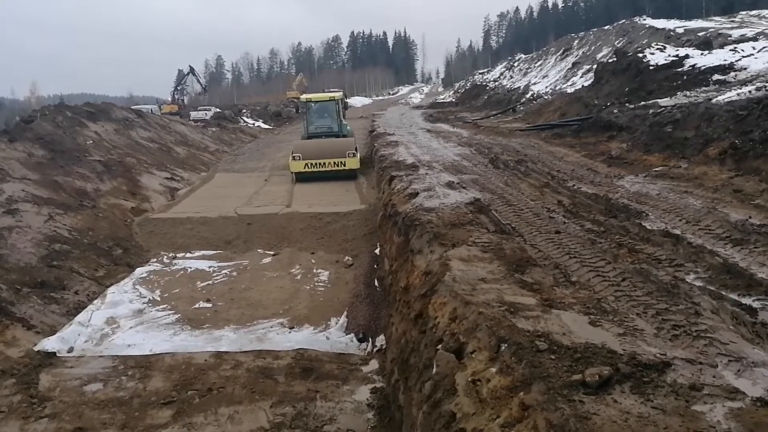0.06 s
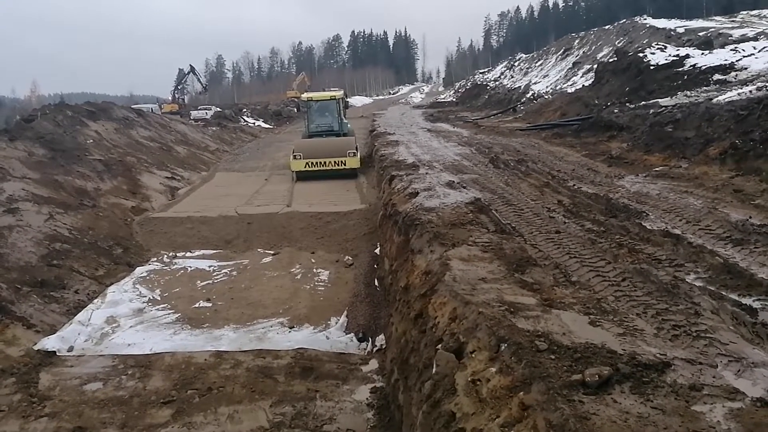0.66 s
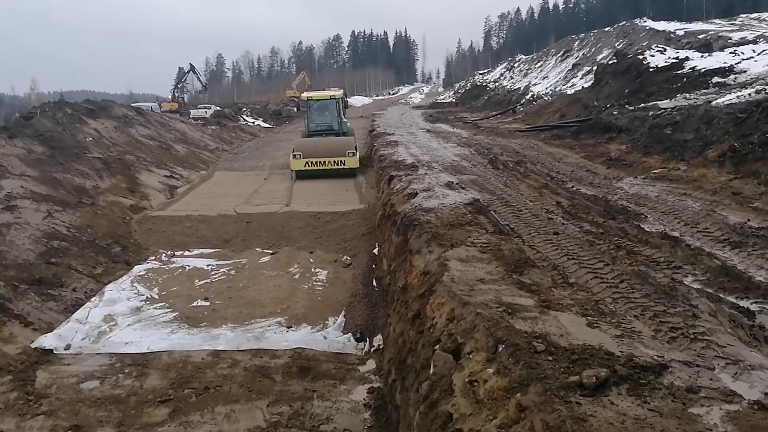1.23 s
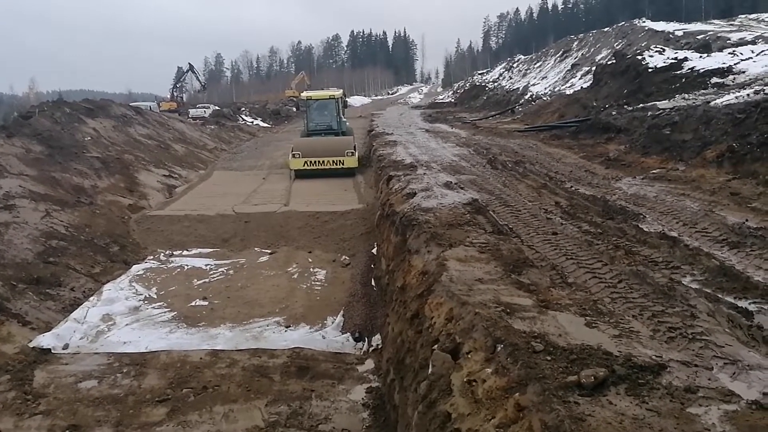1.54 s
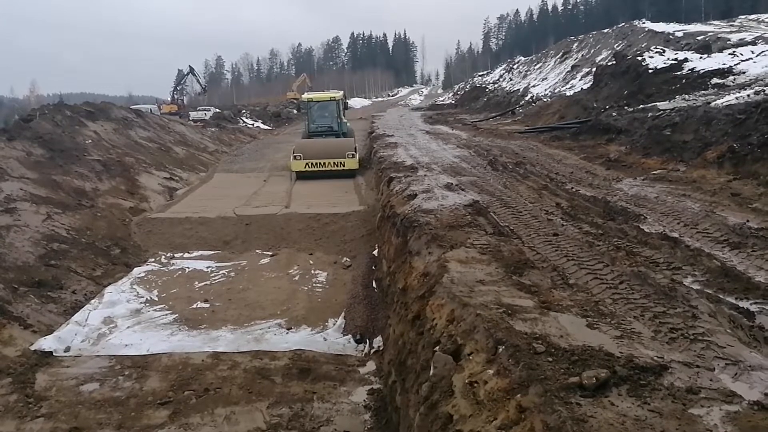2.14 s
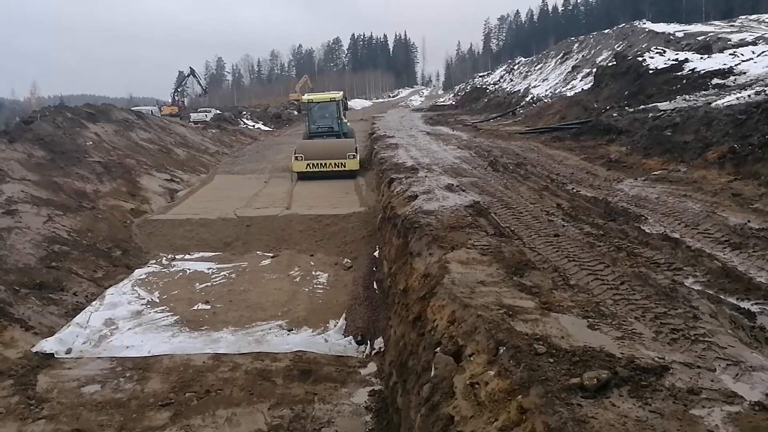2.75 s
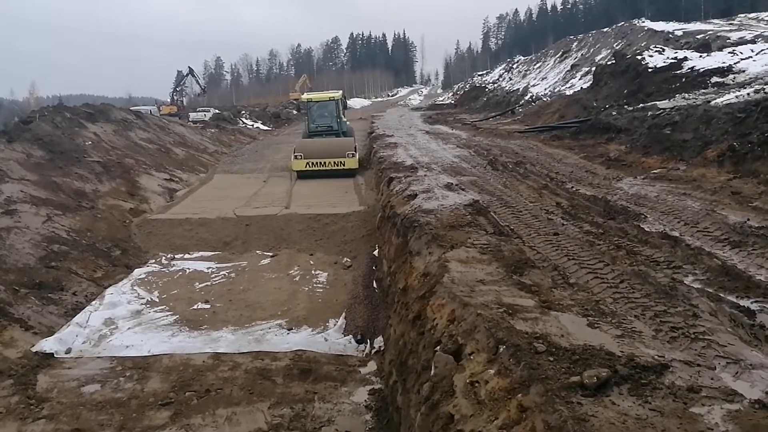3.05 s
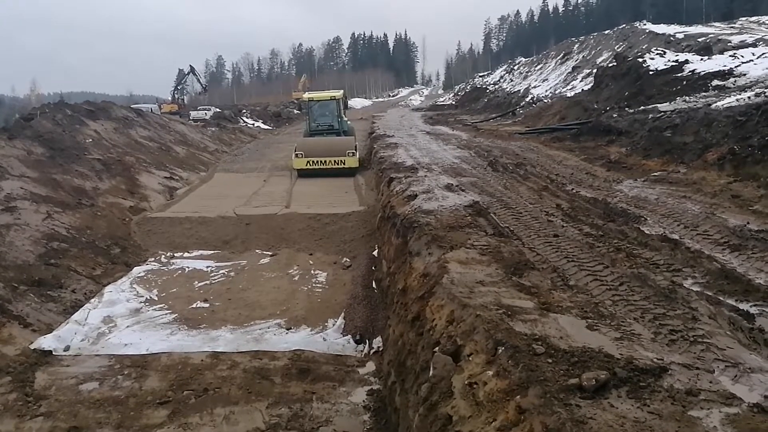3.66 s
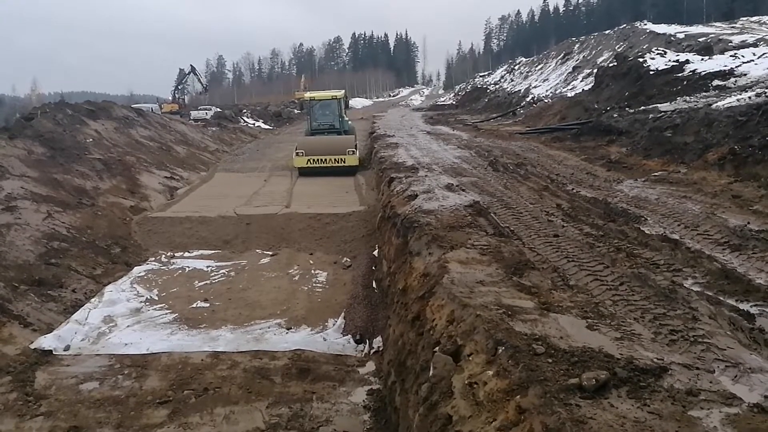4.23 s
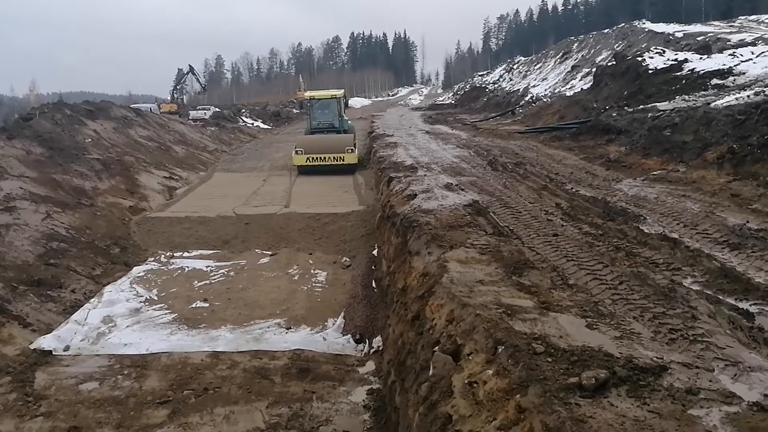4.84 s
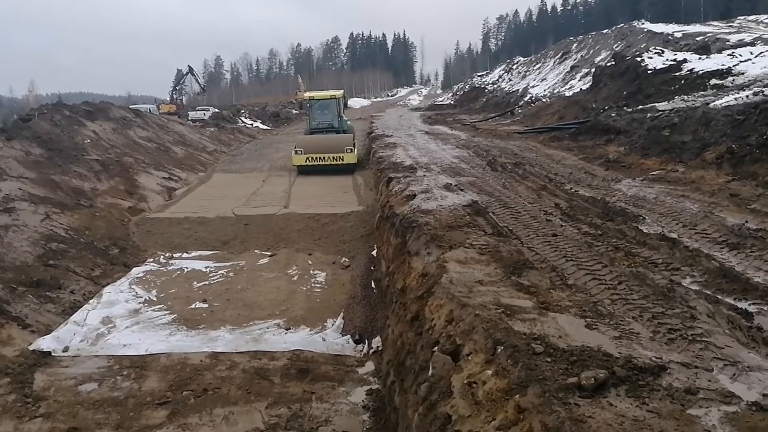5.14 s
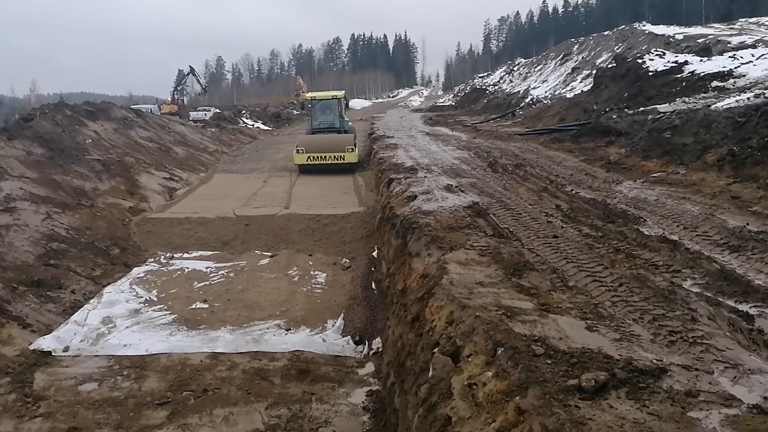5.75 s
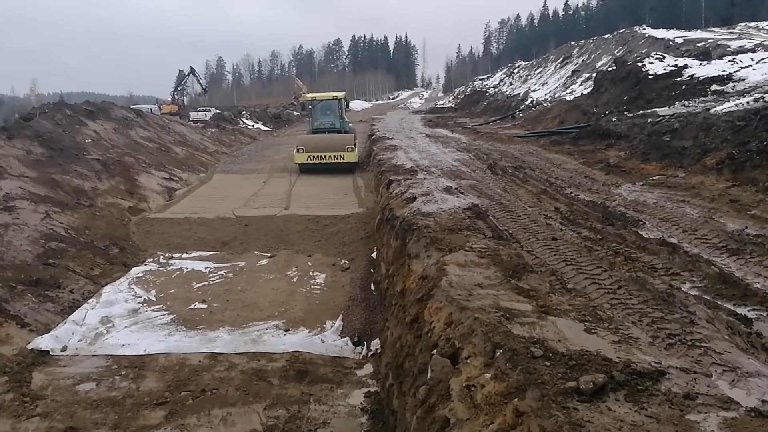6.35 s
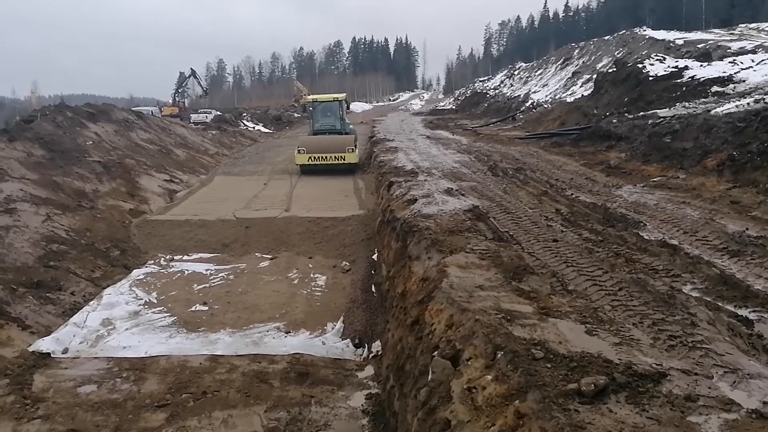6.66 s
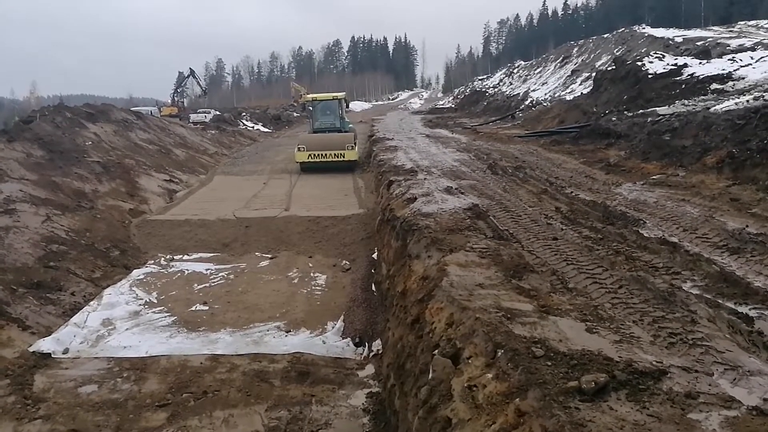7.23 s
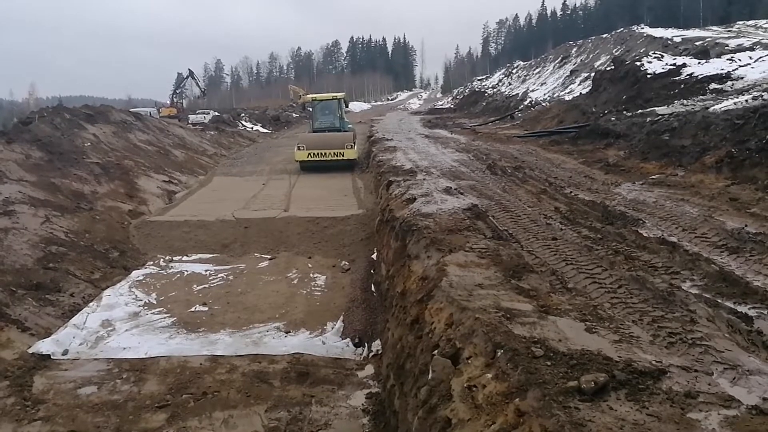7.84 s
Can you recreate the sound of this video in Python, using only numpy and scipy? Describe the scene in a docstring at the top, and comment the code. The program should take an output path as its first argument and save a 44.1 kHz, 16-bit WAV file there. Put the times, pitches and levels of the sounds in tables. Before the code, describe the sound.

A vibrating road roller hums deeply over diesel engine drone, its loose metal rattling ever louder with short steel squeals.

```python
"""A vibratory road roller compacting sand, some way off across an open building site, in stereo.
The eccentric weight in its drum shakes the ground with a deep hum and sets its hollow body booming.
Loose metal rattles ever louder in time with the drum, among squeals of rubbed steel and clinks of grit.
Its diesel, an excavator and a far exhaust drone over the site's low rumble, and the breeze
carries swells of engine roar over to a microphone that is dull in the top treble."""
import sys
import numpy as np
from scipy import signal
from scipy.fft import rfft, irfft
from scipy.io import wavfile

SR = 44100
rng = np.random.default_rng(int(sys.argv[2]) if len(sys.argv) > 2 else 0)


def output_pcm(signal):
    """Save a mono or channel-first signal as 16-bit PCM at the path in sys.argv[1].

    Samples are clipped to [-1, 1] before scaling.
    """
    pcm = np.clip(np.atleast_2d(signal).T, -1, 1) * 32767
    wavfile.write(sys.argv[1], SR, np.round(pcm).astype(np.int16))


N = 352359
TIME = np.arange(N) / SR
BINS = np.fft.rfftfreq(N, 1 / SR)
DIESEL_HZ, DIGGER_HZ, EXHAUST_HZ = 17.497, 14.32, 84.25  # engine cycles a second


def drum(turns):
    """The eccentric weight gives a near sine; blows on the sand add weak overtones."""
    # The hum eases once, midway. Each row: time in seconds, level in dB.
    hum_level = [(2.9, -18), (4.3, -19.5)]
    # Each row: multiple of the shaking rate, level in dB.
    overtones = [(2, -51.5), (3, -46.5), (4, -59.5), (5, -52.5)]
    hum = np.sqrt(2) * amp(curve(hum_level)) * np.cos(2 * np.pi * turns)
    return panned(hum, 3.15) + tones(turns, overtones, flutter=0.25, flutter_hz=1.1)


def pounding(turns, depth=0.2, uneven_db=1.5):
    """Throbbing gain: ground and body shake hardest at both ends of each stroke, no two blows alike."""
    return evened((1 + depth * np.cos(4 * np.pi * turns)) * amp(uneven_db * drift(17)))


def boom(drone_db=-5.5, waver_db=3.5):
    """Uneven blows of the ground make the roller's body drone, with louder spells."""
    # Hollow resonances. Each row: pitch and width in Hz, left and right level in dB.
    body_modes = [(174.8, 25, -40, -44), (239.2, 7.8, -44, -48)]
    # Each row: middle and length in seconds, gain in dB.
    spells = [(1.014, 0.29, -1), (2.003, 0.45, -0.5), (3.4, 0.24, -9), (4.5, 1, 1.5), (5.003, 0.46, 5),
              (5.731, 0.12, 6), (6.505, 0.23, 7.5), (7.605, 0.19, 6.5)]
    drone = amp(drone_db + waver_db * drift(5.5))
    spell_power = sum((amp(db) * swell(s, length)) ** 2 for s, length, db in spells)
    return modes(rng.standard_normal(N), body_modes) * np.sqrt(drone ** 2 + spell_power)


def rattle(turns, start_db=-18.5, growth_db_per_s=2, lead_turns=0.18, jolt_decay_s=0.12):
    """Each shake throws loosening metal into a chatter that sets it ringing; grit ticks on the steel."""
    # Each row: frequency in Hz, left and right level in dB.
    chatter_spectrum = [(200, -89, -85.5), (292, -70, -71), (430, -68, -67.5), (746, -74.5, -79),
                        (1050, -77.5, -76.5), (1500, -79, -70), (2200, -72.5, -78), (2720, -94.5, -96),
                        (3200, -82, -95.5), (3800, -88.5, -88), (5000, -92.5, -101), (7000, -95.5, -101),
                        (10100, -109, -107)]
    # Resonances struck by metal and by grit. Each row: pitch and width in Hz, left and right level in dB.
    metal_modes = [(1033, 12, -60, -53), (1096, 18, -57.5, -53.5), (1900, 41, -62, -56),
                   (2034, 110, -58, -62.5), (2700, 24, -66.5, -69.5), (2860, 18, -59, -64.5),
                   (3027, 40, -55, -62), (3098, 34, -56.5, -65), (3295, 32, -59, -74),
                   (3367, 34, -59.5, -72), (3860, 120, -72, -64), (4220, 60, -72.5, -72)]
    grit_modes = [(4900, 49, -61.5, -75), (5350, 59, -65, -70), (5990, 220, -64, -67.5),
                  (8300, 1000, -71.5, -73.5)]
    # How strongly the metal rings. Each row: time in seconds, gain in dB.
    ring_gain = [(2.7, 2), (6.3, -1.5), (6.68, 3.5), (7.5, 4.5)]
    # Moments of harder shaking. Each row: start in seconds, extra level in dB.
    jolts = [(5.405, 3.5), (6.44, 3), (6.66, 0.5), (6.78, -0.5), (7.2, 3)]
    throw = np.exp(0.25 * np.cos(2 * np.pi * (turns + lead_turns)))  # peaks ahead of the hum's crest
    blows = evened(throw * amp(1.7 * drift(22) + 2.5 * drift(500)))
    jolts_db = sum(db * (TIME > s) * np.exp(-abs(TIME - s) / jolt_decay_s) for s, db in jolts)
    ringing = modes(impacts(blows, per_s=900, spread_db=2), metal_modes) * amp(curve(ring_gain))
    grit = modes(impacts(blows, per_s=280, spread_db=1.5), grit_modes)
    chatter = reflected(coloured(blows * hiss(), chatter_spectrum))
    return (chatter + ringing + grit) * amp(start_db + growth_db_per_s * TIME + jolts_db)


def impacts(blows, per_s, spread_db):
    """Separate knocks of uneven size, thickest where the blows are strong."""
    lands = rng.random(N) < blows ** 2 * per_s / SR
    size = amp(spread_db * np.minimum(rng.exponential(1, N), 2))
    return lands * size * np.sign(hiss())


def squeals(rasp_db=0.5, rasp_hz=70):
    """Rubbed steel sticks and slips, ringing in narrow bands that catch quickly, hold and let go."""
    # Each row: middle and length in seconds, pitch and width in Hz, left and right level in dB.
    scrapes = [(1.52, 0.95, 890, 43, -48.5, -46), (1.45, .7, 1180, 60, -56, -53),
               (1.62, 0.4, 2390, 36, -54, -46.5), (1.557, 0.39, 2163, 35, -54, -46),
               (1.6, 0.41, 2550, 22, -66, -49), (1.52, 0.57, 1347, 8.4, -52, -51),
               (2.204, 0.51, 1348, 5, -54, -47.5), (2.66, 0.34, 2150, 280, -53, -46),
               (3.07, 0.43, 4800, 220, -68, -63), (3.08, .36, 1930, 200, -56, -46),
               (3.33, 0.7, 2425, 70, -61, -48), (3.44, 0.44, 1880, 220, -54, -41.5),
               (3.422, 0.45, 872, 23, -50, -44.5), (4.62, 0.14, 1950, 96, -60, -41.5),
               (4.86, 0.11, 4950, 200, -63, -70), (4.9, 0.16, 2000, 180, -55, -53),
               (6.12, 0.36, 2020, 160, -55, -47), (6.316, .08, 1990, 150, -54, -44),
               (6.606, 0.25, 2100, 200, -50, -46), (6.72, 0.41, 1070, 34, -54, -44),
               (6.86, .24, 4950, 230, -59, -70), (6.883, 0.2, 1980, 220, -45, -48),
               (7.22, .3, 4950, 130, -58.5, -70), (7.35, 0.41, 870, 60, -49, -48),
               (7.68, .1, 2030, 200, -46, -54), (7.845, 0.15, 2010, 160, -47, -45)]
    rub = hiss() * amp(rasp_db * drift(rasp_hz))
    return sum(swell(s, length) ** 0.6 * modes(rub, [mode]) for s, length, *mode in scrapes)


def clinks():
    """Metal and grit clink and scrape: bursts of noise in one band, dying quickly."""
    # Each row: start in seconds, level in dB, centre in Hz, width in octaves,
    # seconds to fall 60 dB, left over right in dB.
    hits = [(0.681, -62, 9500, .2, .01, 0), (3.32, -55, 3100, .15, .25, 5),
            (3.892, -54.5, 5000, 0.3, 0.37, -4), (5.3997, -48, 4900, 0.2, .04, 5),
            (5.405, -44, 2100, 0.3, .1, -4), (5.414, -36, 1840, 0.081, 0.2, 0),
            (5.418, -44.5, 2920, 0.3, 0.12, 5), (5.434, -53, 5200, 0.2, 0.08, 7),
            (5.469, -52, 4930, .1, .14, 7), (5.856, -58, 11000, .08, .07, -7),
            (6.157, -51, 5400, .3, 0.027, 4), (6.45, -46, 2600, 0.6, 0.12, 0),
            (7.135, -49, 5000, 0.5, 0.027, 4), (7.2687, -46, 5600, .6, .005, 2),
            (7.2691, -43, 10200, .12, 0.009, -6), (7.668, -50, 5400, 0.62, .05, 6),
            (7.856, -48, 4200, .5, .03, 0)]
    out, t = np.zeros((2, N)), np.arange(SR // 2) / SR
    octave = np.log2(np.fft.rfftfreq(len(t), 1 / SR) + 1)
    for s, db, hz, width, t60, pan_db in hits:
        band = np.exp(-((octave - np.log2(hz)) / width) ** 2 / 2)
        burst = evened(irfft(rfft(rng.standard_normal((2, len(t)))) * band, len(t)))
        decay = np.exp(-np.log(1000) * t / t60)
        part = out[:, round(s * SR):][:, :len(t)]
        part += panned(burst * amp(db) * decay, pan_db)[:, :part.shape[1]]
    return out


def diesel(cycles):
    """The roller's four-stroke engine, firing four times in each cycle."""
    # Each row: multiple of the cycle rate, level in dB.
    orders = [(4, -54), (7, -49), (9, -46.5), (10, -47), (10.5, -53), (11, -49), (11.5, -59), (12, -56),
              (13, -55), (17, -54), (17.5, -59), (18, -51), (19, -55), (20, -62), (20.5, -60), (25.5, -58),
              (28, -64), (28.5, -62), (29, -65), (31, -61), (31.5, -56.5), (32, -55.3), (33, -64),
              (34, -65), (35, -64), (35.5, -62), (36, -66), (38.5, -66), (40, -64), (41.5, -66), (42, -66)]
    # How hard it pulls. Each row: time in seconds, gain in dB.
    pull = [(0, 0), (6.7, -1), (7.3, 2), (7.85, 4)]
    return tones(cycles, orders, flutter=0.25, flutter_hz=1.33) * amp(curve(pull))


def roar(cycles, repeating_share=0.18, split_hz=1400):
    """Fan and combustion: hiss and a clatter that repeats every two cycles, swelling on the breeze."""
    # The steady roar and what the breeze adds. Each row: frequency in Hz, left and right level in dB.
    steady_spectrum = [(294, -100, -100), (567, -81, -72.5), (745, -75, -75.5), (840, -74, -72),
                       (1030, -72.5, -69), (1610, -80.5, -74.5), (1840, -80.5, -72.5), (2210, -85.5, -76),
                       (2730, -87, -86.5), (3140, -88.5, -93), (3850, -96, -87), (4420, -95.5, -96.5),
                       (6300, -100, -99.5), (9700, -113, -111)]
    carried_spectrum = [(505, -101.5, -101), (804, -65, -65.5), (890, -71.5, -64), (1090, -81.5, -62),
                        (1170, -76.5, -76.5), (2150, -73, -64), (2760, -80.5, -68.5), (2600, -88.5, -74.5),
                        (2850, -96.5, -99), (5000, -108, -104), (12000, -130, -130)]
    size = round(2 * SR / DIESEL_HZ)
    clatter = rng.standard_normal((2, size))[:, (cycles / 2 % 1 * size).astype(int)]
    noise = np.sqrt(repeating_share) * clatter + np.sqrt(1 - repeating_share) * hiss()
    steady = coloured(noise, steady_spectrum)
    carried = coloured(hiss(), carried_spectrum) * amp(1.2 * drift(7.6))
    low = signal.sosfiltfilt(signal.butter(4, split_hz, fs=SR, output="sos"), carried)
    low_gain, high_gain = breeze()
    return steady * amp(0.5 * drift(11)) + low * low_gain + (carried - low) * high_gain


def breeze(calm_low_db=-11, calm_high_db=-24):
    """Gusts carry the roar to the microphone: gains for its low and its high band."""
    # Each row: peak time, 20 dB rise and 20 dB fall in seconds, low and high band gain in dB.
    gusts = [(1.4, 0.51, 1.07, -6.5, -10), (2.9, 0.41, 0.46, -7, -14), (3.38, 0.76, 0.96, -18, -9),
             (4.62, 0.37, 0.41, -22, -14), (5.5, 0.37, 0.56, -8.5, -15), (6.55, 0.23, 0.41, -5.5, -23),
             (7.8, 0.9, 0.3, -8, -10.5)]
    power = amp([[calm_low_db], [calm_high_db]]) ** 2
    for s, rise, fall, low_db, high_db in gusts:
        away = (TIME - s) / np.where(TIME < s, rise, fall)
        power = power + amp(np.array([[low_db], [high_db]]) - 20 * away ** 2) ** 2
    return np.sqrt(power)


def excavator():
    """An excavator's engine and the whine of its pump, swelling and fading."""
    # Each row: multiple of the cycle rate, level in dB.
    orders = [(4, -56), (8, -53), (12, -54), (16, -52), (23, -61), (24, -60), (26, -62), (27, -49.5),
              (28, -60), (36, -57), (72, -65), (85, -68)]
    # Each row: time in seconds, gain in dB.
    level = [(0, 4.5), (0.55, 2.5), (1.1, 1), (2.3, 1), (2.85, -3), (3.25, 2.5), (3.55, -1.5), (3.8, 2),
             (4.6, 3.5), (5.15, 0.5), (5.55, 5.5), (5.95, -2.5), (6.55, 6.5), (7.2, 4.5), (7.9, 2)]
    return tones(shaft(DIGGER_HZ, wander=0.001), orders, flutter=0.14, flutter_hz=3) * amp(curve(level))


def exhaust():
    """The low exhaust note of a third machine, far off."""
    # Each row: multiple of the note, level in dB.
    orders = [(1, -37), (2, -52)]
    return tones(shaft(EXHAUST_HZ, wander=0.0004), orders, flutter=0.08, flutter_hz=3)


def rumble(gain_db=-2):
    """The low, nearly steady noise of the whole site."""
    # Each row: frequency in Hz, left and right level in dB.
    spectrum = [(25, -54, -52), (45, -59.5, -60), (77.5, -57.5, -56), (98, -58.5, -56), (132, -61.5, -57),
                (170, -56, -64), (212, -62.5, -75), (238, -61, -67.5), (307, -61.5, -64), (373, -65.5, -68),
                (570, -68, -68.5), (665, -81.5, -72.5), (1500, -115, -115)]
    return coloured(hiss(), spectrum) * amp(gain_db + 0.21 * drift(4.7))


def shaft(hz, wander):
    """Turns made by a governed engine whose speed hunts slightly."""
    return np.cumsum(hz * (1 + wander * drift(0.7))) / SR


def tones(turns, orders, flutter, flutter_hz):
    """Multiples of a shaft speed; moving air and ground echoes make each one fade and shift."""
    # Where the tones sit. Each row: frequency in Hz, left over right in dB.
    tone_pan = [(26, 16), (220, 1), (320, -3.5), (700, 7.5), (1050, -4)]
    out, shaft_hz = np.zeros((2, N)), turns[-1] / TIME[-1]
    for multiple, db in orders:
        angle = 2 * np.pi * (multiple * turns + rng.random())
        fading = (1 + flutter * drift(flutter_hz)) * np.cos(angle)
        shifting = flutter * drift(flutter_hz) * np.sin(angle)
        tone = amp(db) * (fading + shifting) * np.sqrt(2 / (1 + 2 * flutter ** 2))
        out += panned(tone, read(tone_pan, multiple * shaft_hz)[0])
    return out


def reflected(x, echo_db=-9, longest_s=0.013, count=8):
    """Short echoes off the ground and the machine comb the treble differently on each side."""
    delay, toss = rng.uniform(0.1014, 1, (2, 2, count, 1))
    polarity = np.sign(toss - np.median(toss))
    echoes = (polarity * np.exp(-2j * np.pi * BINS * delay * longest_s)).sum(axis=1)
    treble = BINS / (BINS + 1500)
    return irfft(rfft(x) * (1 + amp(echo_db) * treble * echoes / np.sqrt(count)), N)


def modes(drive, table):
    """The resonances of one object under a drive, each with its own level left and right."""
    out, spectrum = np.zeros((2, N)), rfft(drive)
    for hz, width, left_db, right_db in table:
        ring = evened(irfft(spectrum / (1 + 1j * (BINS - hz) / width) ** 2, N))
        out += ring * amp([[left_db], [right_db]])
    return out


def coloured(white, spectrum):
    """Gives two white noises a spectrum per channel and makes them alike in the bass."""
    # Likeness of the microphone's two sides. Each row: frequency in Hz, coherence from 0 to 1.
    coherence = [(20, 0.55), (80, 0.96), (180, 1), (350, 1), (600, 0.55), (850, 0.28), (1200, 0.099),
                 (3000, 0.047), (8000, 0.15)]
    a, b = rfft(white)
    same = read(coherence, BINS)[0]
    pair = np.array([a, same * a + np.sqrt(1 - same ** 2) * b])
    return irfft(pair * amp(read(spectrum, BINS)) * np.sqrt(SR / 2), N)


def hiss():
    """Two unrelated white noises."""
    return rng.standard_normal((2, N))


def drift(hz, step=100):
    """A random wander of rms 1, smoothed above about hz and drawn every step samples."""
    t = TIME[::step]
    f = np.fft.rfftfreq(len(t), step / SR)
    slow = irfft(rfft(rng.standard_normal(len(t))) * np.exp(-(f / hz) ** 2) * (f > 0), len(t))
    return np.interp(TIME, t, evened(slow))


def swell(middle, length):
    """A smooth arch from silence to 1 and back."""
    return np.cos(np.pi * np.clip((TIME - middle) / length, -0.5, 0.5))


def curve(rows):
    """A time table at every sample."""
    return np.interp(TIME, *np.transpose(rows))


def read(rows, hz):
    """The columns of a spectrum table at the given frequencies."""
    f, *columns = np.transpose(rows)
    return np.array([np.interp(np.log(hz + 1), np.log(f + 1), c) for c in columns])


def panned(x, pan_db):
    """Places a sound pan_db louder on the left than on the right."""
    return x * amp(np.array([[pan_db], [-pan_db]]) / 2)


def amp(db):
    """Decibels to gain."""
    return 10 ** (np.asarray(db) / 20)


def evened(x):
    """Scales to rms 1."""
    return x / np.sqrt(np.mean(x ** 2) + 1e-20)


def scene():
    """The roller's drum, metal and diesel, with two other machines, over the rumble of the site."""
    # The drum slows a little under load. Each row: time in seconds, shakes a second.
    drum_speed = [(3.5, 26.62), (6.3, 26.47)]
    turns = shaft(curve(drum_speed), wander=0.001)
    cycles = shaft(DIESEL_HZ, wander=0.0005)
    site = rumble()
    machines = drum(turns) + diesel(cycles) + excavator() + exhaust()
    throb = (site + boom()) * pounding(turns)
    return machines + throb + squeals() + clinks() + rattle(turns) + reflected(roar(cycles))


def record(dry, edge_hz=15100):
    """The microphone: soft ends, treble that falls away, then the band limit."""
    # Each row: frequency in Hz, gain in dB.
    response = [(100, -1), (10000, -1.5), (11800, -13.5), (14500, -22.5)]
    eased = dry * signal.windows.tukey(N, 0.002)
    heard = irfft(rfft(eased) * amp(read(response, BINS)), N)
    lowpass = signal.firwin(511, edge_hz, window=("kaiser", 9), fs=SR)
    return signal.oaconvolve(heard, lowpass[None], "same")


dry = scene()
out = record(dry)
output_pcm(out)
```